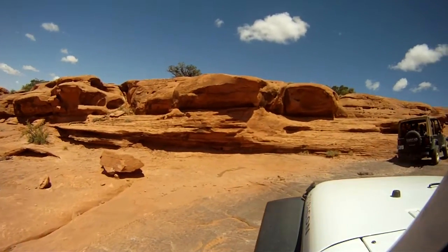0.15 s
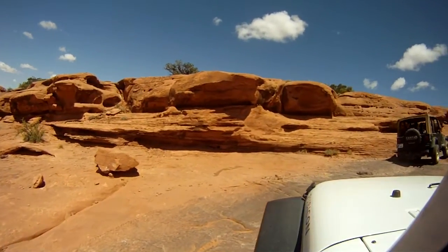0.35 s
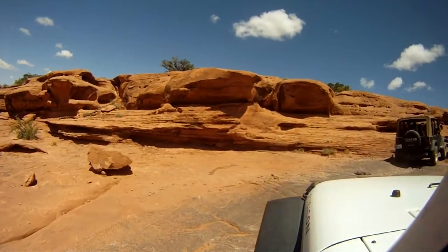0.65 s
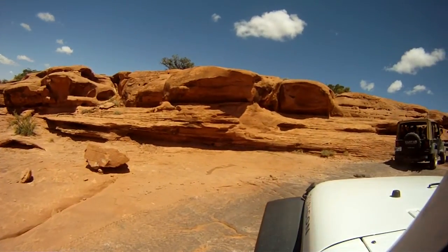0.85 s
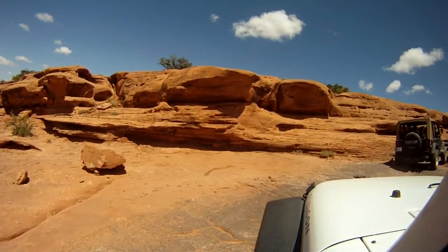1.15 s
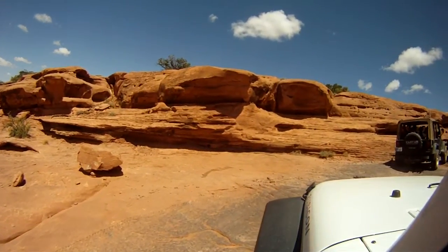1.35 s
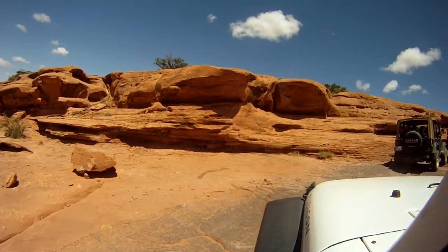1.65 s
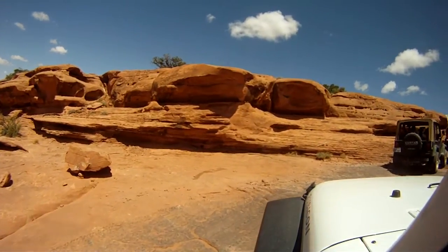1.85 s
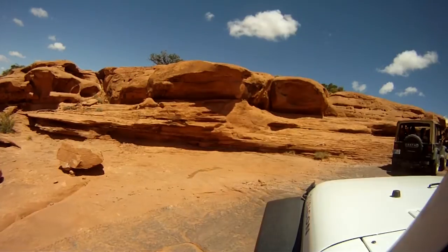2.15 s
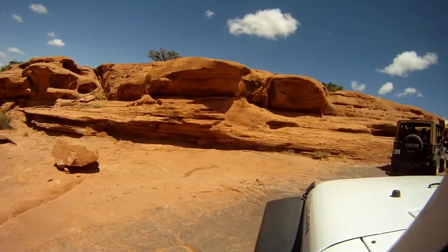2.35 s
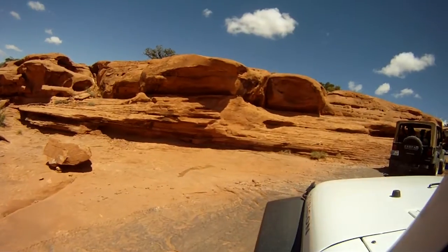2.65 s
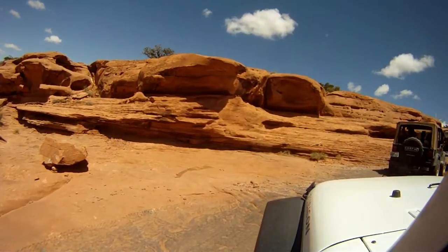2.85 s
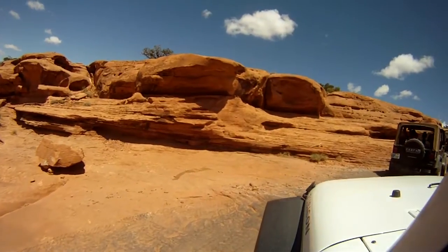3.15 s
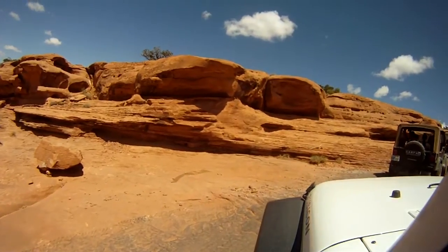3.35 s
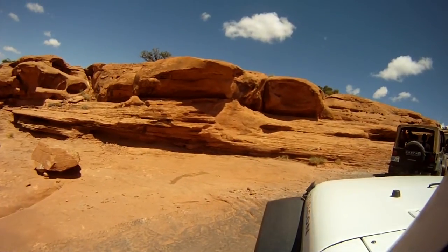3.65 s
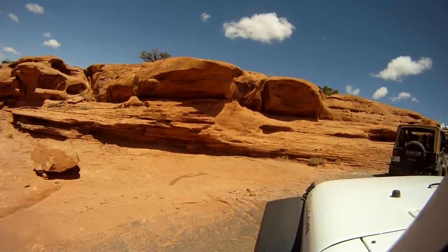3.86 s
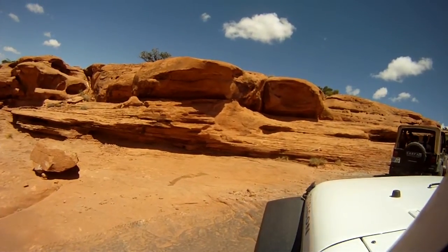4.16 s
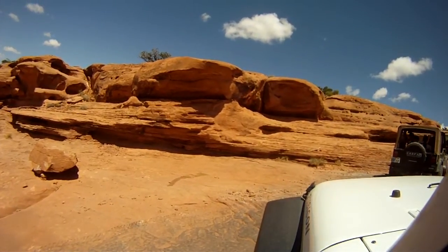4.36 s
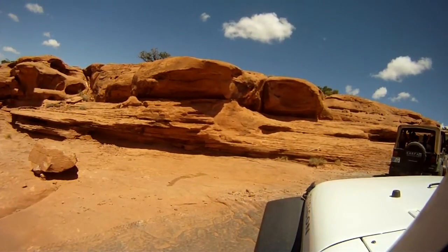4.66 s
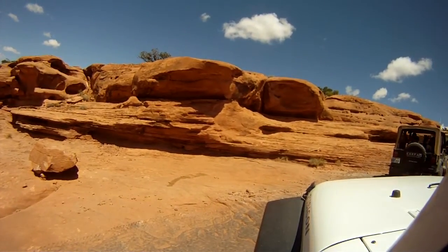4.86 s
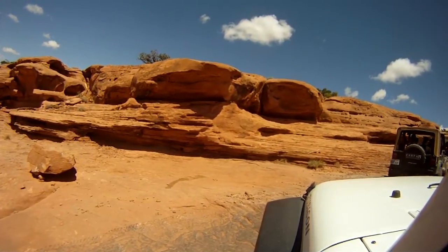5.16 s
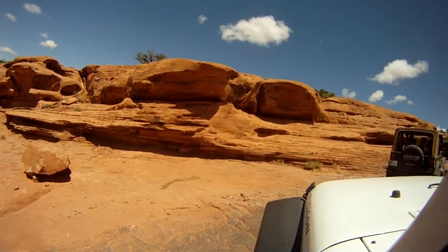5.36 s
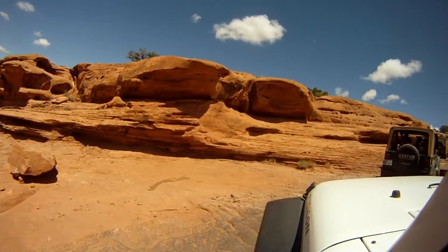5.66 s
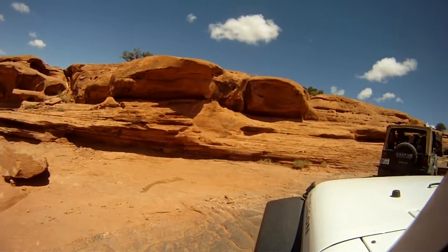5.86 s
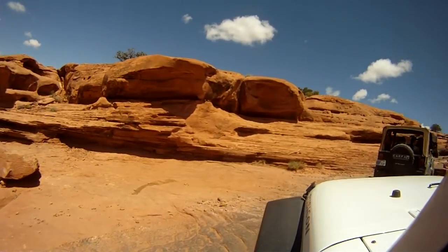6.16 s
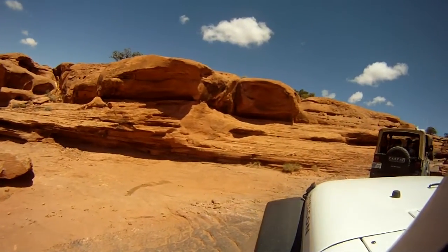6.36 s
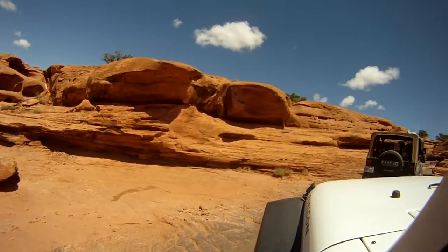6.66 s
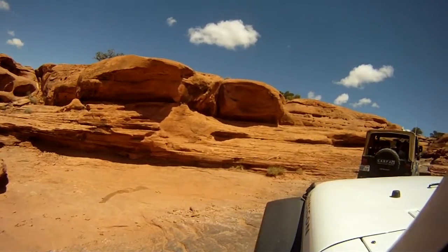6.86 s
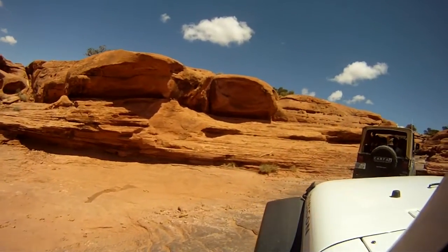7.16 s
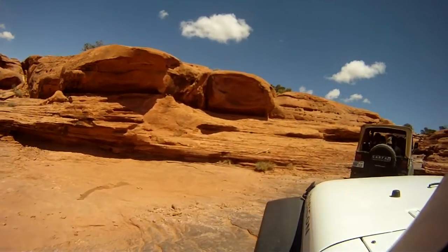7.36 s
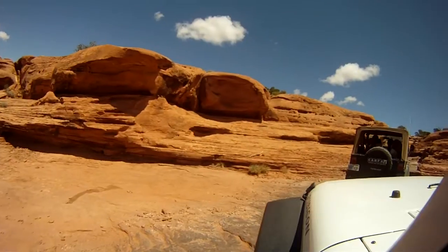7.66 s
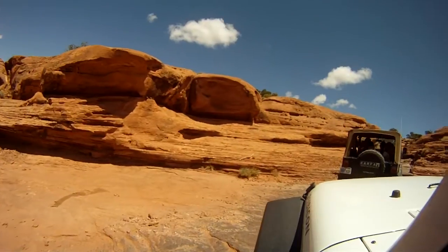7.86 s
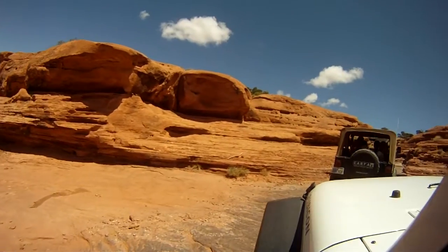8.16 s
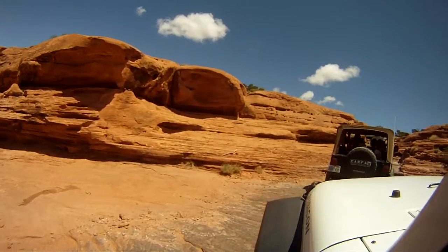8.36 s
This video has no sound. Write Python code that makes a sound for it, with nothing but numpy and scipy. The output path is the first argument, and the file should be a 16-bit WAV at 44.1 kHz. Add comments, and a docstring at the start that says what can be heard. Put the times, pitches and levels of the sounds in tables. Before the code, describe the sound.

Close on the flank of a slowly crawling off-road car outdoors on rock, a small dull camera microphone catches deep uneven exhaust throbbing. A rapid cluster of metallic squeaks and two soft thuds comes first, then isolated clicks and a low body lurch with a rubbery creak near the middle. Later a second low drone pulses in, beating against the engine, while wind buffets harder.

```python
"""On bare sandstone, an off-road car crawls behind another one, heard from a small camera on its flank.
Its exhaust throbs on deep sine waves and puffs of noise; a second exhaust drones in and beats against it.
The body lurches and thuds in slow ringing noise; squeaks, creaks and squeals are trembling sine waves.
Clicks are short noise bursts that ring the chassis, and tyres grind grit made of scattered noise grains.
Shaped noise makes the wind and the engine bay, which hisses more in the second half."""
import sys
import numpy as np
from scipy import signal
from scipy.fft import rfft, irfft, next_fast_len
from scipy.io import wavfile
from scipy.ndimage import uniform_filter1d

SR = 44100
rng = np.random.default_rng(int(sys.argv[2]) if len(sys.argv) > 2 else 0)


def transcribe(signal):
    """Save signal, clipped to [-1, 1], as a 16-bit WAV file at the path in sys.argv[1]."""
    frames = np.atleast_2d(signal).T
    limited = np.clip(frames, -1, 1)
    pcm = np.round(limited * 32767).astype(np.int16)
    wavfile.write(sys.argv[1], SR, pcm)


N = 375732
T = np.arange(N) / SR  # time in seconds

# how often the cylinders fire: time_s, firing_hz
FIRING_RATE = [(0, 50), (0.3, 45.7), (0.85, 43.9), (1.75, 48.3), (2.3, 43.5), (2.8, 45.2), (3.3, 42.7),
               (3.75, 41.5), (4.25, 43.6), (4.53, 39.8), (4.72, 41.2), (5.0, 45.7), (5.55, 43.4),
               (5.83, 49.7), (6.1, 44.2), (7.1, 50.2), (7.35, 46), (7.8, 43), (8.52, 49)]
# load on the engine, as the level of its exhaust boom: time_s, level_db
LOAD = [(0.0, -44.5), (0.47, -30), (0.59, -33), (0.66, -45.5), (0.85, -31.5), (1.33, -27.5), (1.8, -43.5),
        (1.97, -35), (2.99, -27), (3.13, -30.5), (3.2, -42), (3.39, -34), (3.44, -43), (3.51, -38),
        (4.27, -29), (4.72, -41.5), (4.91, -26), (5.15, -32), (5.55, -49), (6.12, -27.5), (6.34, -25),
        (6.64, -35.5), (6.71, -55), (6.79, -37), (7.12, -43), (7.4, -28.5), (7.74, -44), (7.81, -34.5),
        (8.07, -40.5), (8.14, -40.5), (8.47, -38), (8.52, -37)]
# uneven cylinders and pipe overtones: multiple of crank speed, level_db against the firing note
LOPE = [(1, -21), (2, -36), (4, -25), (5, -25), (6, -42), (7, -43), (10, -40), (11, -40), (13, -33),
        (15, -33), (17, -44), (19, -47), (21, -41), (22, -48), (23, -46)]
# hollow hum at three times the firing rate: time_s, level_db
HUM = [(0, -83), (0.4, -58), (0.7, -73), (1.25, -52.5), (1.75, -66.5), (2.35, -64), (2.92, -50.5),
       (3.3, -67.5), (4.7, -63.5), (4.97, -51.5), (5.3, -68.5), (5.85, -52.5), (6.6, -59.5), (7.25, -48.5),
       (7.45, -57), (8.25, -66.5), (8.52, -52.5)]
# tone of the exhaust gas: pitch_hz, relative level_db per Hz
BURBLE = [(60, -16), (100, -1.5), (160, 5), (230, -2), (280, -5.5), (330, -8), (400, -12.5), (700, -21.5),
          (1500, -39)]
# gas noise at crawling load, and the dB it gains per dB of load and of strain
CRAWL_DB, GAS_DB, GAS_PER_LOAD, GAS_PER_STRAIN = -32, -57.5, 0.47, 0.23

# surges of the second drone: start_s, length_s, start_hz, end_hz, level_db, flutter_db
SURGES = [(5.11, 0.69, 54.9, 58.04, -26.5, 1), (6.42, 0.16, 58.1, 60.7, -26, 3.5),
          (6.614, 0.55, 64.67, 61.06, -24.5, 12.5), (7.52, .2, 57.5, 60.2, -26.5, -1.5),
          (7.834, 0.42, 62.8, 65.1, -28.5, 0.5), (8.364, 0.11, 67, 65, -27.5, 11)]
# the release is a share of each surge's length; gas is set against the drone
SURGE_ATTACK_S, SURGE_RELEASE_SHARE, FLUTTER_HZ, SURGE_GAS_DB = 0.048, 0.45, 8.9, -33

# the body drops off a ledge and sways on its tyres; the rise is the time to the peak
LURCH_S, LURCH_DB, LURCH_RISE_S = 2.8, -36.5, 0.23
# what sways (filtered twice): pitch_hz, width_hz, level_db
SWAY_MODES = [(24.6, 9.6, 0)]
# dull thuds as a wheel drops: start_s, level_db
THUDS = [(0.31, -50.5), (0.41, -53)]
# what the body thuds with (filtered twice): pitch_hz, width_hz, level_db
BODY_MODES = [(136, 40, -1.5), (191, 47, 0), (300, 90, -10)]
THUD_DECAY_S = 0.048

# squeaks, one row a slip: start_s, length_s, start_hz, end_hz, level_db, upper_hz, upper_db against the note
SQUEAKS = [(0.11, 0.017, 1630, 1640, -47, 3350, -15), (0.124, 0.047, 1710, 1594, -45.5, 3390, -14),
           (0.161, 0.028, 1610, 1660, -57.5, 3390, -1), (0.171, 0.047, 1666, 1608, -42.5, 3360, -18),
           (0.194, 0.025, 1605, 1461, -42, 3496, -14), (0.204, 0.029, 1555, 1640, -42.5, 3100, -11.5),
           (0.223, 0.023, 1644, 1555, -39, 3110, -10.5), (0.237, 0.04, 1629, 1597, -48.5, 3240, -13),
           (0.385, 0.039, 1727, 1710, -59.5, 3420, 1), (0.407, 0.023, 1650, 1653, -48, 3405, -23)]
# thin top note where a slip pinches: start_s, length_s, level_db
PINCHES = [(0.145, 0.047, -65), (0.199, .019, -64), (0.39, .025, -73)]
PINCH_HZ, SQUEAK_TAIL_S, SQUEAK_TAIL_DB = 5140, 0.094, -14.5

# chassis clicks and scuffs: start_s, level_db, decay_s, ring_db against the scrape
CLICKS = [(1.515, -54, 0.026, 7), (1.538, -62, 0.022, 7), (2.425, -61, 0.012, -3), (2.563, -58.5, 0.01, 1),
          (2.827, -58.5, 0.0079, 1), (3.227, -60.5, 0.014, -9), (3.31, -63.5, 0.022, -11),
          (4.264, -57.5, 0.052, -16), (4.296, -62, 0.034, 3), (4.749, -56.5, 0.028, -6),
          (4.773, -59, 0.021, -11), (5.735, -59, 0.012, -10), (6.492, -64, 0.011, 1),
          (6.659, -52.5, 0.012, 23), (7.965, -61, 0.011, -11)]
# chassis ring: pitch_hz, width_hz, level_db
CHASSIS_MODES = [(1040, 76, 8.5), (2076, 98, 0), (2410, 32, 9), (2440, 25, -15.5), (3100, 51, 1),
                 (3200, 46, -18), (3670, 46, -28)]
# tone of dry scraping, for clicks and grit: pitch_hz, relative level_db per Hz
SCRAPE = [(400, -12), (900, -17), (1550, 2.5), (1800, -3), (2300, 8.5), (2750, -16), (3700, -2),
          (5500, -20.5)]

# rubbery suspension creaks: start_s, level_db
CREAKS = [(0.314, -61), (0.414, -60.5), (2.332, -63.5), (2.565, -58.5), (2.83, -51), (2.92, -63),
          (4.935, -64), (7.12, -60.5)]
# the dull lower note is set against the upper one
CREAK_HZ, CREAK_S, CREAK_LOW_HZ, CREAK_LOW_DB = 749, 0.03, 338, -2.5
# faint thin squeals of dragging brakes: start_s, length_s, start_hz, end_hz, level_db
SQUEALS = [(1.992, 0.23, 3690, 3710, -74.5), (4.323, 0.13, 3650, 3800, -74),
           (4.551, 0.058, 1640, 1570, -66), (5.244, 0.055, 1520, 1570, -72), (5.496, 0.31, 2120, 2510, -70),
           (7.759, 0.094, 2243, 2240, -63.5), (8.184, 0.22, 1970, 1930, -70)]

# strain in the engine bay, as the level of belt and pump hiss: time_s, level_db
STRAIN = [(0, -71.5), (2.4, -72.5), (3.25, -68), (4.1, -76.5), (4.35, -66.5), (6.0, -67), (6.6, -64.5),
          (7.8, -63.5), (8.52, -70.5)]
# what the hiss rings in: pitch_hz, width_hz, level_db
BAY_MODES = [(1580, 85, -4.5), (2080, 140, -6.5), (2217, 167, 1.5), (2400, 57, -1), (3036, 76, -6.5),
             (3410, 140, -15), (3640, 85, -11.5), (5130, 750, -17)]
# reference strain, steering pump whine at that strain, and the dB it gains per dB of strain
STRAIN_DB, WHINE_DB, WHINE_PER_STRAIN = -66, -74, 2
# tone of the fan and tyre rush, always there: pitch_hz, relative level_db per Hz
RUSH_TONE = [(180, -24.5), (300, -14.5), (327, -4), (374, -11), (665, -12), (707, -11.5), (799, -12.5),
             (881, -15), (1110, -16), (1610, -20.5), (2260, -22), (3150, -22.5), (3780, -22.5),
             (5080, -24.5), (5600, -26.5), (7280, -77), (12300, -120)]
# rush at the reference strain, and the dB it gains per dB of strain
RUSH_DB, RUSH_PER_STRAIN = -64.5, 0.086

# wind on the microphone: time_s, level_db
WIND = [(0, -44), (0.33, -39), (0.6, -46), (1.1, -45.5), (1.6, -49.5), (2.2, -46), (3.2, -45), (3.65, -45),
        (4.25, -44.5), (4.8, -53), (5.85, -48.5), (6.15, -40), (6.65, -33.5), (7.2, -37.5), (7.6, -38.5),
        (7.9, -37.5), (8.52, -42)]
# tone of the buffeting: pitch_hz, relative level_db per Hz
BUFFET = [(10, -19.5), (20, -10.5), (32, -6.5), (50, -3), (70, 0.5), (85, -16.5), (100, -20), (130, -24),
          (200, -33), (700, -50), (1500, -58.5)]

# the camera's sampling rate, copies of each held value, and highest pitch it passes on
AUDIO_RATE_HZ, HOLD, TOP_HZ = 12000, 4, 15200


def undb(db):
    """Turn decibels into gain."""
    return 10 ** (np.asarray(db) / 20)


def unit(x):
    """Scale to an rms (average strength) of 1."""
    return x / np.sqrt(np.mean(x ** 2) + 1e-20)


def curves(table):
    """The columns of a table, joined by straight lines in time."""
    s, *columns = np.transpose(table)
    return [np.interp(T, s, column) for column in columns]


def walk(rate):
    """Smooth random wander with an rms of 1, drawing new values at about this rate in Hz."""
    k = max(int(SR / rate), 2)
    steps = np.repeat(rng.standard_normal(N // k + 1), k)
    smooth = uniform_filter1d(uniform_filter1d(steps, k), k)
    return unit(smooth[:N])


def noise():
    """White noise."""
    return rng.standard_normal(N)


def colour(x, points):
    """Shape a sound by pitch and dB points, falling 20 dB an octave beyond both ends."""
    hz, db = np.transpose(points)
    size = next_fast_len(N)
    octave = np.log2(np.arange(size // 2 + 1) * SR / size + 1)
    beyond = np.abs(octave - np.clip(octave, np.log2(hz[0]), np.log2(hz[-1])))
    gain = undb(np.interp(octave, np.log2(hz), db) - 20 * beyond)
    return irfft(rfft(x, size) * gain, size)[:N]


def ring(x, modes):
    """Resonances side by side, each with a pitch, a width and a level."""
    out = 0
    for hz, width, db in modes:
        out = out + undb(db) * signal.lfilter(*signal.iirpeak(hz, hz / width, fs=SR), x)
    return out


def add(out, s, sound):
    """Mix a short sound in at time s."""
    i = max(int(s * SR), 0)
    out[i:i + len(sound)] += sound[:N - i]


def slip(length, start_hz, end_hz, rough):
    """Phase and swell of one stick-slip burst whose pitch trembles by the share rough."""
    n = int(length * SR)
    tremble = unit(uniform_filter1d(rng.standard_normal(n), size=90))
    hz = np.linspace(start_hz, end_hz, n) * (1 + rough * tremble)
    swell = np.sqrt(2) * np.sin(np.pi * (np.arange(n) + .5) / n)
    return 2 * np.pi * np.cumsum(hz) / SR, swell


def engine():
    """Six cylinders fire three times a turn; boom, overtones and gas puffs grow with load, a hum comes and goes."""
    hz, = curves(FIRING_RATE)
    load_db, = curves(LOAD)
    strain_db, = curves(STRAIN)
    hum_db, = curves(HUM)
    firing = 2 * np.pi * np.cumsum(hz * (1 + .003 * walk(20))) / SR
    crank = firing / 3
    # no two cylinders fire alike, so notes stand at many multiples of the crank speed
    lope = np.zeros(N)
    for k, db in LOPE:
        lope += undb(db + 2 * walk(9)) * np.sin(k * crank + rng.uniform(0, 2 * np.pi))
    boom = np.sqrt(2) * (np.sin(firing) + lope)
    hum = np.sqrt(2) * np.sin(3 * firing)
    puffs = 1 + 0.64 * np.sin(firing)
    gas = unit(colour(noise() * puffs, BURBLE))
    gas_db = GAS_DB + GAS_PER_LOAD * (load_db - CRAWL_DB) + 1.3 * walk(9)
    gas_db += GAS_PER_STRAIN * (strain_db - STRAIN_DB)
    return undb(load_db) * boom + undb(hum_db) * hum + undb(gas_db) * gas


def leader():
    """A deep drone, likely the exhaust of the car ahead: one low note and a little gas rise, flutter and fade."""
    out = np.zeros(N)
    waver = 1 + 0.0055 * walk(18)
    gas = undb(SURGE_GAS_DB) * unit(colour(noise(), BURBLE))
    for s, length, start_hz, end_hz, db, flutter_db in SURGES:
        t = T[:int(length * SR)]
        rise = t / SURGE_ATTACK_S
        fade = (length - t) / (SURGE_RELEASE_SHARE * length)
        swell = np.clip(np.minimum(rise, fade), 0, 1)
        flutter = undb(-flutter_db * np.sin(np.pi * FLUTTER_HZ * (t - SURGE_ATTACK_S)) ** 2)
        hz = np.linspace(start_hz, end_hz, len(t)) * np.interp(s + t, T, waver)
        drone = np.sqrt(2) * np.sin(2 * np.pi * np.cumsum(hz) / SR)
        add(out, s, undb(db) * swell * flutter * (drone + np.interp(s + t, T, gas)))
    return out


def lurch():
    """A slow, uneven shudder of the body that swells quickly and dies away."""
    age = np.maximum(T - LURCH_S, 0) / LURCH_RISE_S
    sway = unit(ring(ring(noise(), SWAY_MODES), SWAY_MODES))
    return undb(LURCH_DB) * age * np.exp(1 - age) * sway


def thuds():
    """The suspension takes a drop and the body rumbles briefly."""
    shake = np.zeros(N)
    t = T[:SR // 2]
    for s, db in THUDS:
        add(shake, s, undb(db) * np.exp(-t / THUD_DECAY_S))
    return shake * unit(ring(ring(noise(), BODY_MODES), BODY_MODES))


def squeaks():
    """Metal sticks and slips in quick chirps with an upper note; the rock throws back a faint tail."""
    out = np.zeros(N)
    for s, length, start_hz, end_hz, db, upper_hz, upper_db in SQUEAKS:
        note, swell = slip(length, start_hz, end_hz, rough=0.011)
        upper, _ = slip(length, upper_hz, upper_hz, rough=0.021)
        add(out, s, undb(db) * swell * (np.sin(note) + undb(upper_db) * np.sin(upper)))
    for s, length, db in PINCHES:
        pinch, swell = slip(length, PINCH_HZ, PINCH_HZ, rough=0.0174)
        add(out, s, undb(db) * swell * np.sin(pinch))
    t = T[:SR // 2]
    tail = rng.standard_normal(len(t)) * np.exp(-t / SQUEAK_TAIL_S)
    echo = signal.fftconvolve(out, tail / np.linalg.norm(tail))[:N]
    return out + undb(SQUEAK_TAIL_DB) * echo


def clicks():
    """Loose parts strike once and chatter: a dry scrape that also rings the chassis."""
    scrape, chatter, strikes = np.zeros(N), np.zeros(N), np.zeros(N)
    t = T[:SR // 4]
    for s, db, decay, ring_db in CLICKS:
        # the division shares the level between scrape and ring
        burst = undb(db) * np.exp(-t / decay) / np.sqrt(1 + undb(2 * ring_db))
        add(scrape, s, burst)
        add(chatter, s, burst * undb(ring_db))
        # the first contact is a single sample sized by the energy of its burst
        add(strikes, s, np.array([np.linalg.norm(burst) * undb(ring_db)]))
    dry_scrape = scrape * unit(colour(noise(), SCRAPE))
    blows = undb(12.5) * chatter * noise() + undb(6.5) * strikes
    return dry_scrape + ring(blows, CHASSIS_MODES)


def creaks():
    """Rubber bushes give way, always around the same pair of short dull notes."""
    out = np.zeros(N)
    for s, db in CREAKS:
        note, swell = slip(CREAK_S, CREAK_HZ, CREAK_HZ, rough=0.018)
        low, _ = slip(CREAK_S, CREAK_LOW_HZ, CREAK_LOW_HZ, rough=0.022)
        add(out, s, undb(db) * swell * (np.sin(note) + undb(CREAK_LOW_DB) * np.sin(low)))
    return out


def brakes():
    """Dragging pads sing faintly for a moment."""
    out = np.zeros(N)
    for s, length, start_hz, end_hz, db in SQUEALS:
        note, swell = slip(length, start_hz, end_hz, rough=0.017)
        add(out, s, undb(db) * swell * np.sin(note))
    return out


def engine_bay():
    """Under strain, belts hiss through the bay's resonances and the steering pump whines in a narrow band."""
    hiss_db, = curves(STRAIN)
    whine_db = WHINE_DB + WHINE_PER_STRAIN * (hiss_db - STRAIN_DB)
    hiss = unit(ring(noise(), BAY_MODES)) * undb(hiss_db + 1.5 * walk(25))
    whine = unit(ring(noise(), [(1080, 46, 0)])) * undb(whine_db + 1.3 * walk(14))
    return hiss + whine


def grit():
    """Tyres grind grit: about 160 grains a second, at random times and strengths, scrape dryly."""
    strength = undb(1.64 * np.minimum(rng.exponential(size=N), 4))
    grains = (rng.random(N) < 160 / SR) * noise() * strength
    return unit(colour(grains, SCRAPE)) * undb(-77.5)


def rush():
    """A constant rush of fan and tyres, wavering slightly and barely rising with strain."""
    strain_db, = curves(STRAIN)
    rush_db = RUSH_DB + RUSH_PER_STRAIN * (strain_db - STRAIN_DB) + 0.74 * walk(14)
    return unit(colour(noise(), RUSH_TONE)) * undb(rush_db)


def wind():
    """Eddies thump on the microphone port as low noise of wandering level."""
    db, = curves(WIND)
    return unit(colour(noise(), BUFFET)) * undb(db + 2.44 * walk(6.9))


def scene():
    """Everything at the one microphone."""
    car = engine() + leader() + lurch() + thuds()
    parts = squeaks() + clicks() + creaks() + brakes()
    background = engine_bay() + grit() + rush() + wind()
    return (car + parts + background)[None]


def record(dry):
    """The camera samples slowly and holds each value, mirroring sound faintly into the treble over thin hiss."""
    slow = signal.resample_poly(dry, AUDIO_RATE_HZ, SR, axis=-1)
    slow = signal.lfilter(*signal.butter(1, 5600, fs=AUDIO_RATE_HZ), slow)
    steps = np.repeat(slow, HOLD, axis=-1)
    held = signal.resample_poly(steps, SR, AUDIO_RATE_HZ * HOLD, axis=-1)[:, :N]
    hiss = undb(-83.5) * unit(colour(noise(), [(3000, -1), (7000, -3), (13000, -15)]))
    low_pass = signal.ellip(12, .2, 70, TOP_HZ, fs=SR, output="sos")
    return signal.sosfilt(low_pass, held + hiss)


dry = scene()
out = record(dry)
transcribe(out)
```